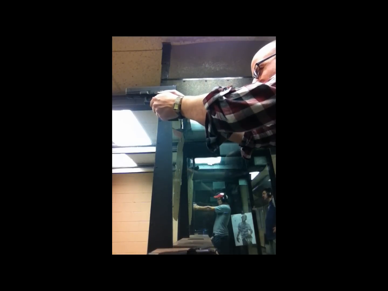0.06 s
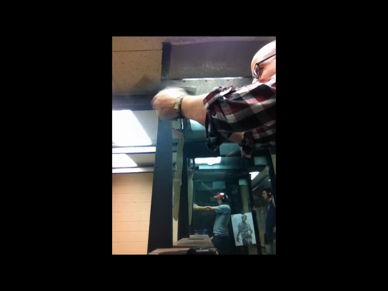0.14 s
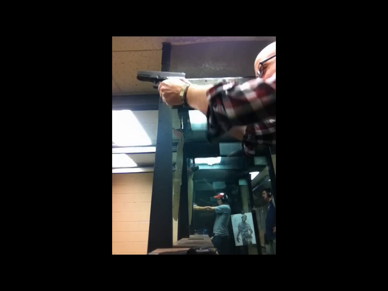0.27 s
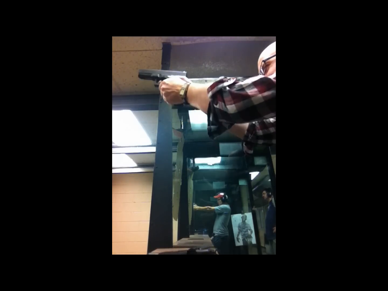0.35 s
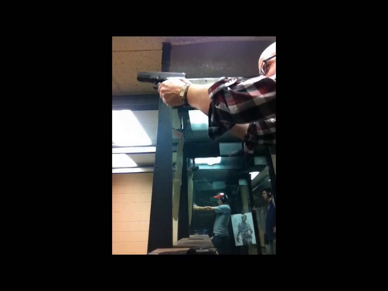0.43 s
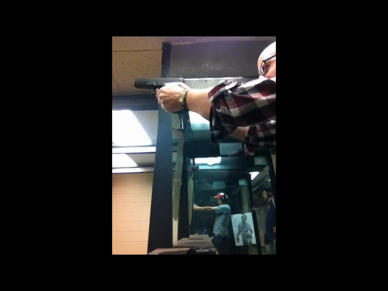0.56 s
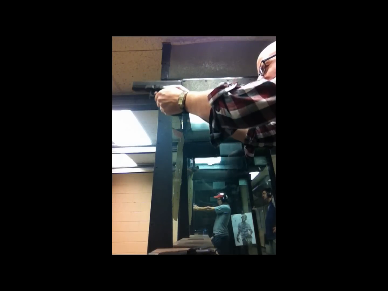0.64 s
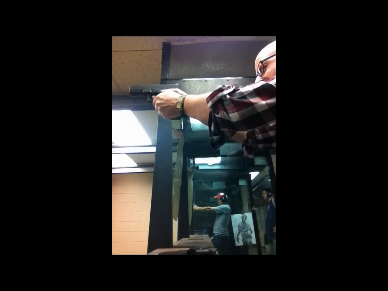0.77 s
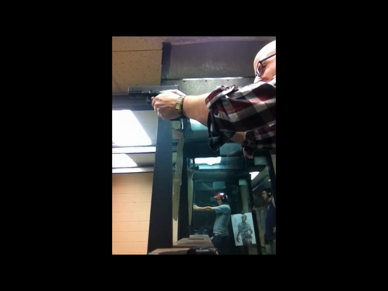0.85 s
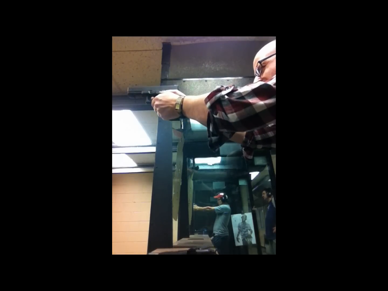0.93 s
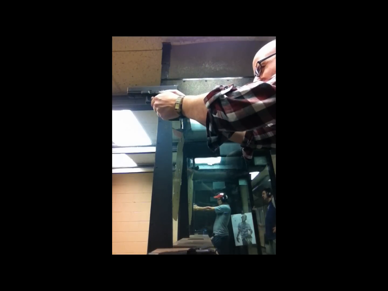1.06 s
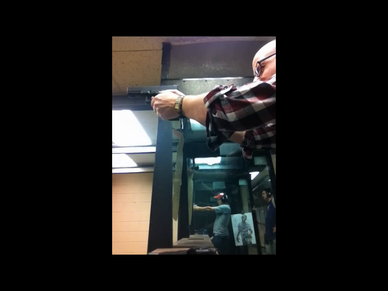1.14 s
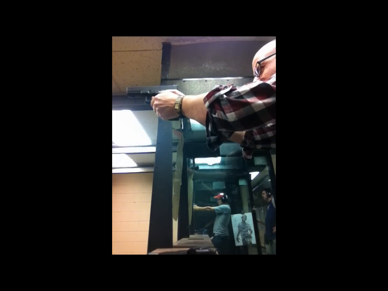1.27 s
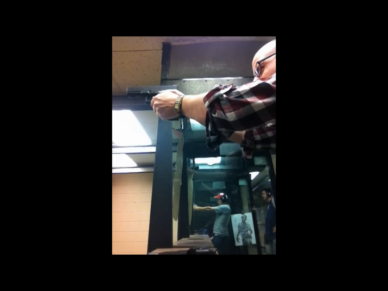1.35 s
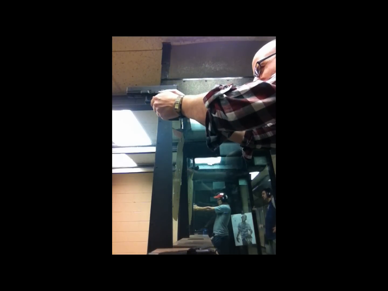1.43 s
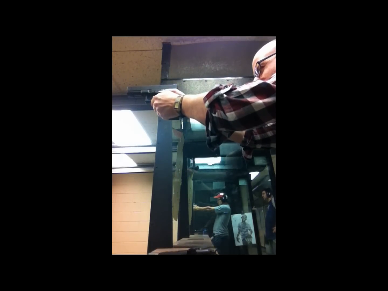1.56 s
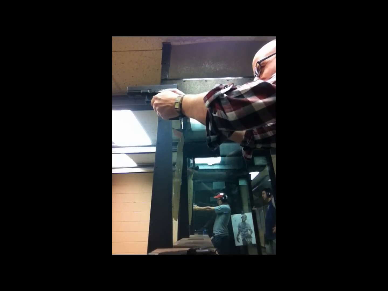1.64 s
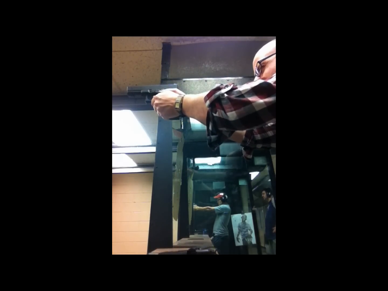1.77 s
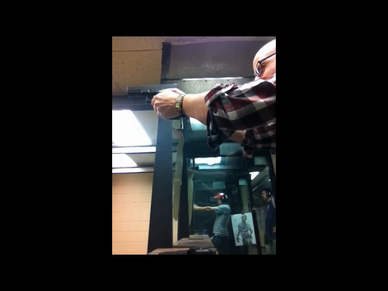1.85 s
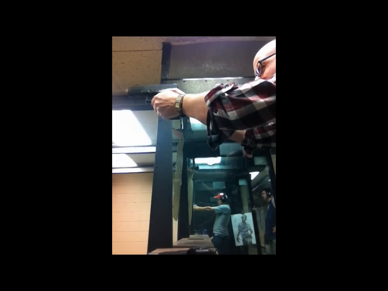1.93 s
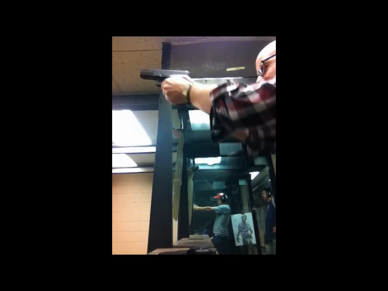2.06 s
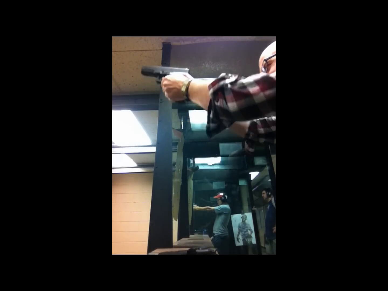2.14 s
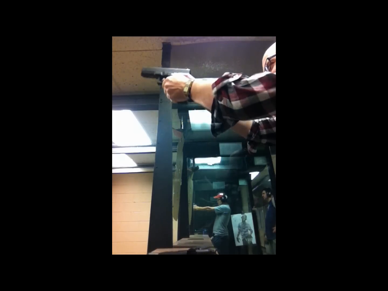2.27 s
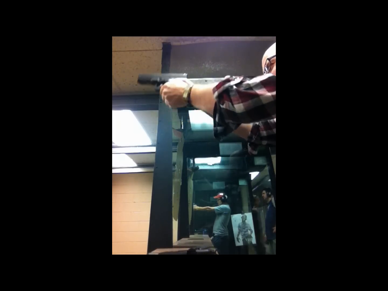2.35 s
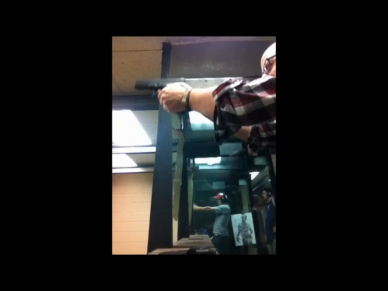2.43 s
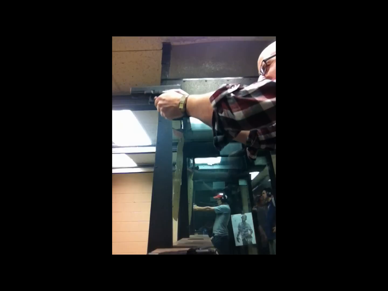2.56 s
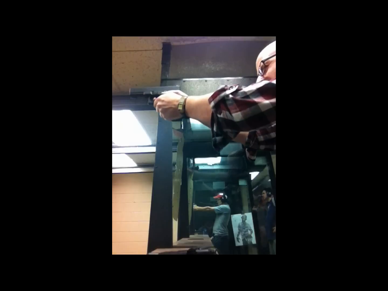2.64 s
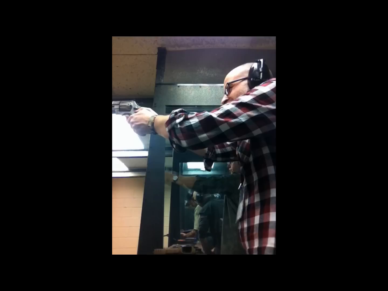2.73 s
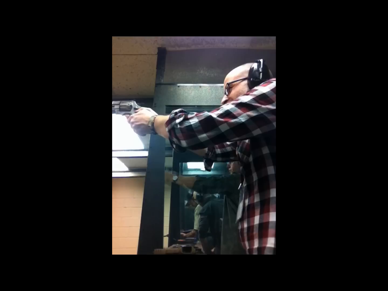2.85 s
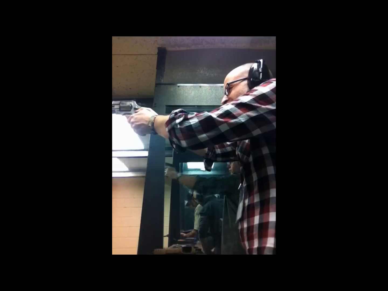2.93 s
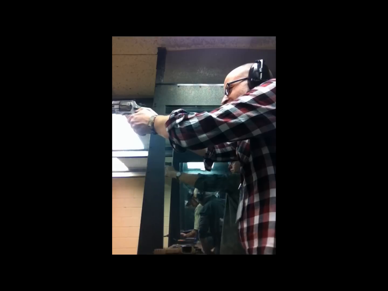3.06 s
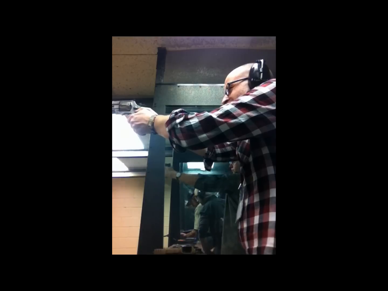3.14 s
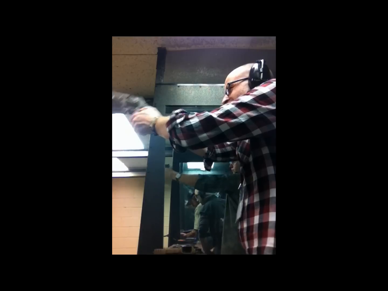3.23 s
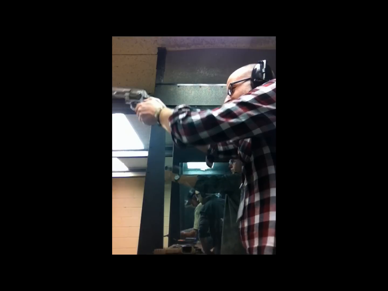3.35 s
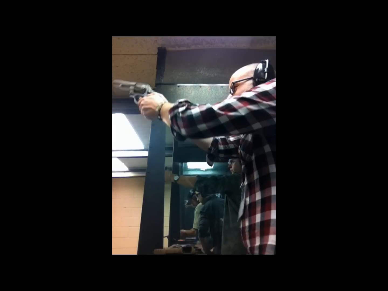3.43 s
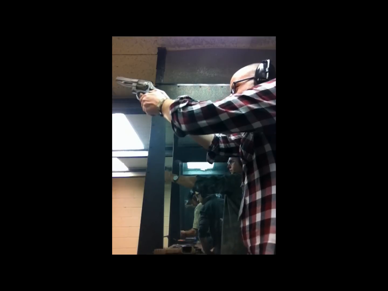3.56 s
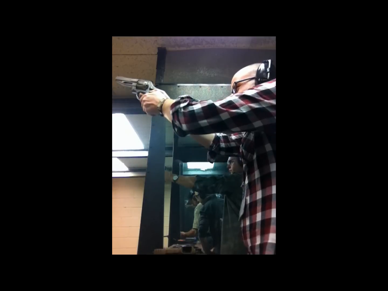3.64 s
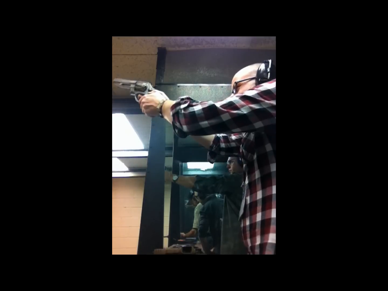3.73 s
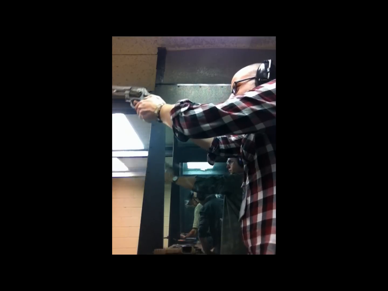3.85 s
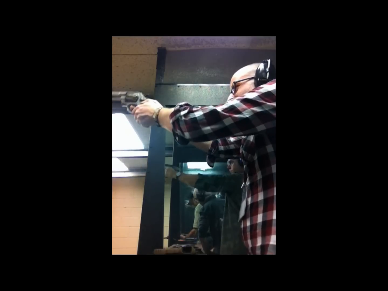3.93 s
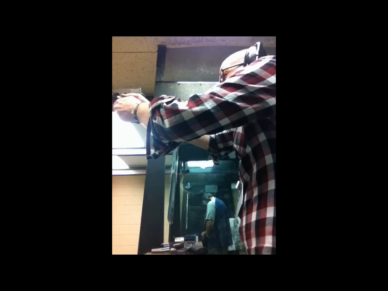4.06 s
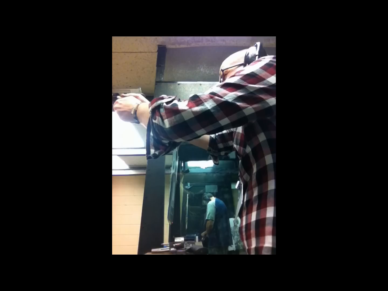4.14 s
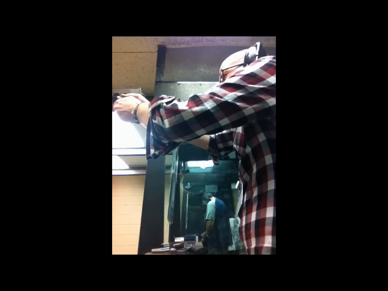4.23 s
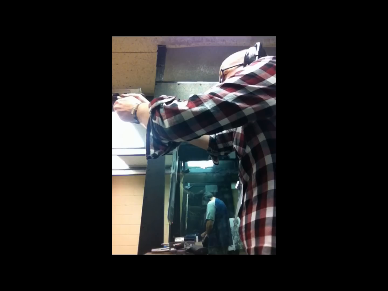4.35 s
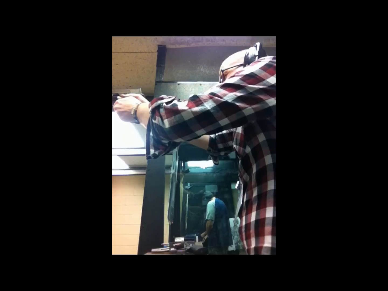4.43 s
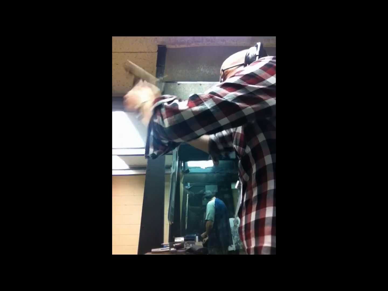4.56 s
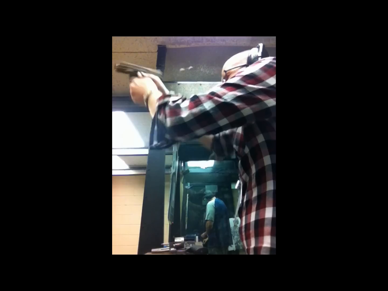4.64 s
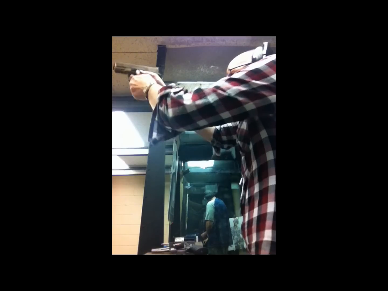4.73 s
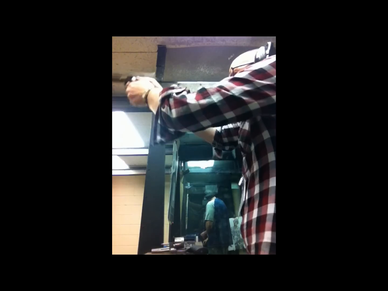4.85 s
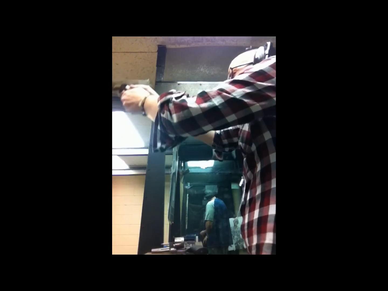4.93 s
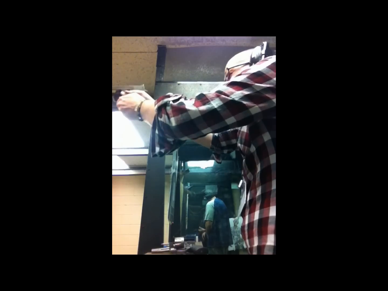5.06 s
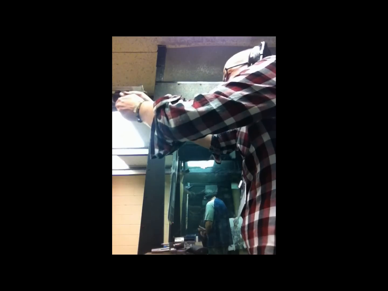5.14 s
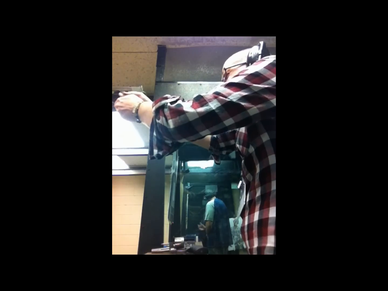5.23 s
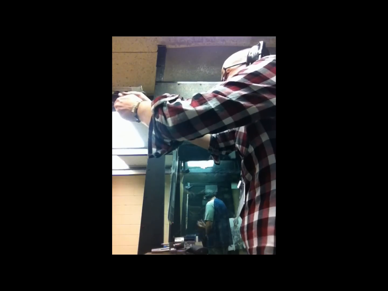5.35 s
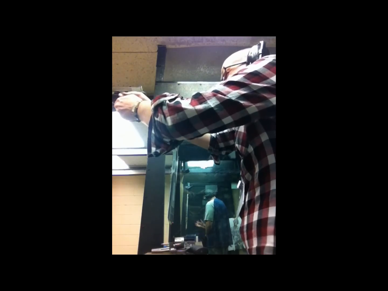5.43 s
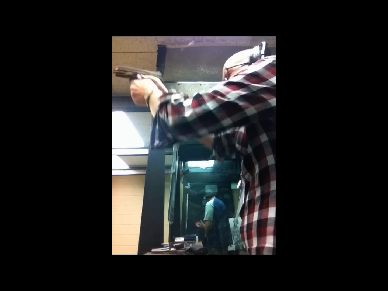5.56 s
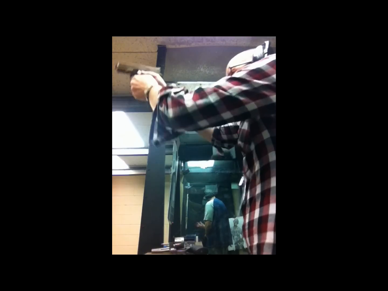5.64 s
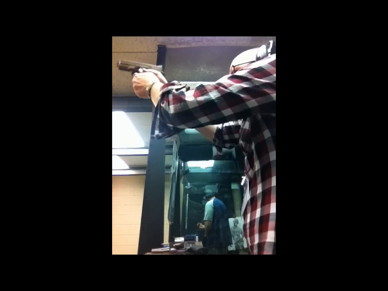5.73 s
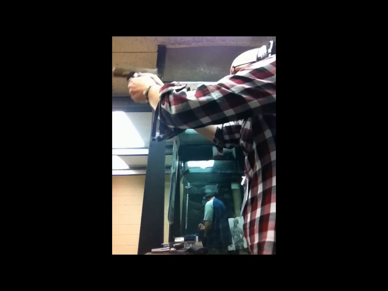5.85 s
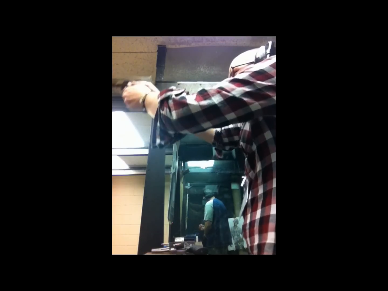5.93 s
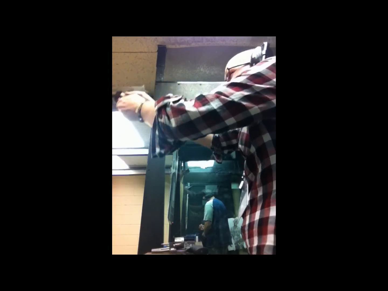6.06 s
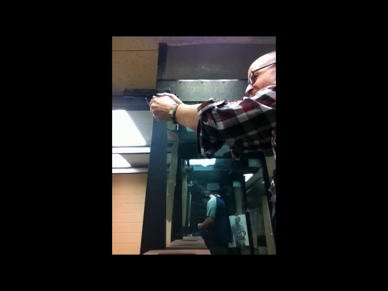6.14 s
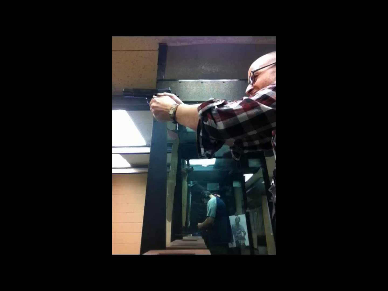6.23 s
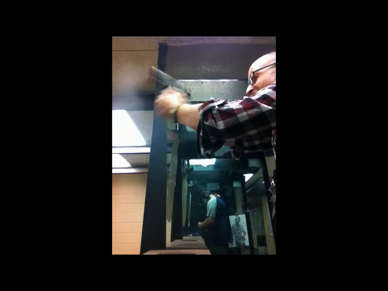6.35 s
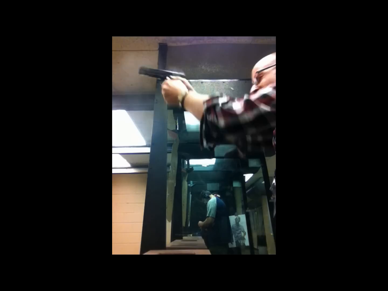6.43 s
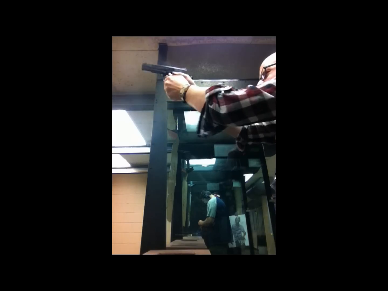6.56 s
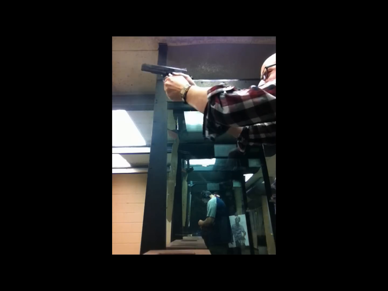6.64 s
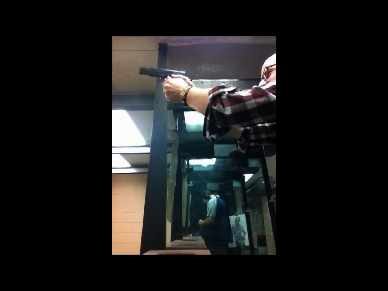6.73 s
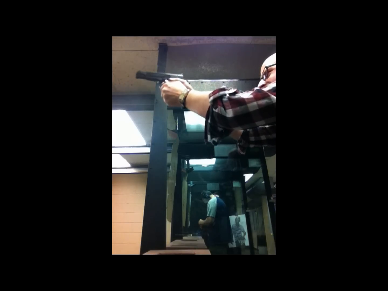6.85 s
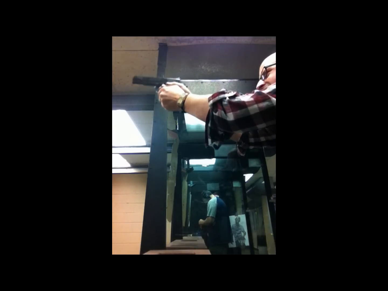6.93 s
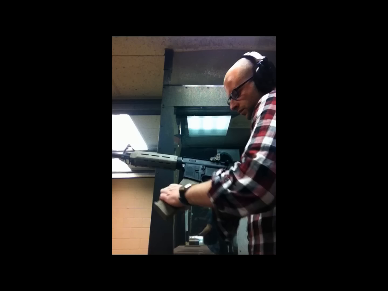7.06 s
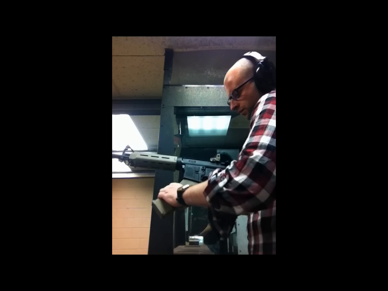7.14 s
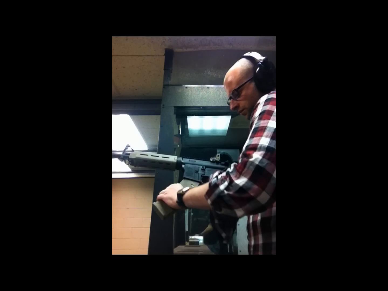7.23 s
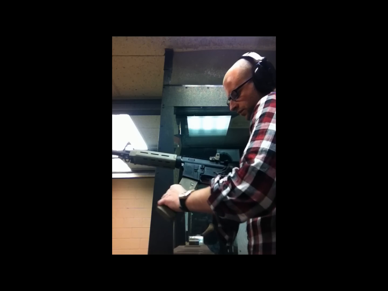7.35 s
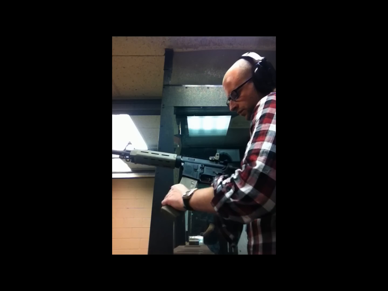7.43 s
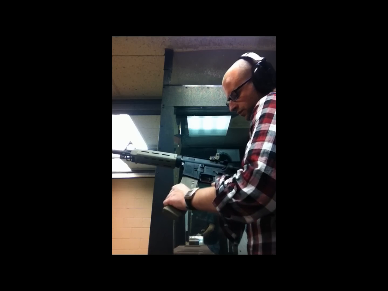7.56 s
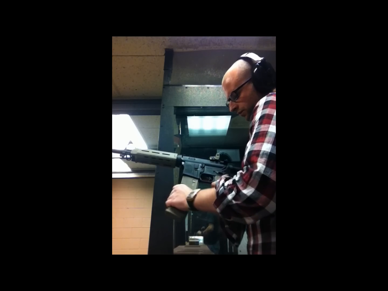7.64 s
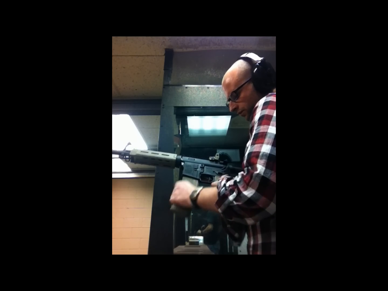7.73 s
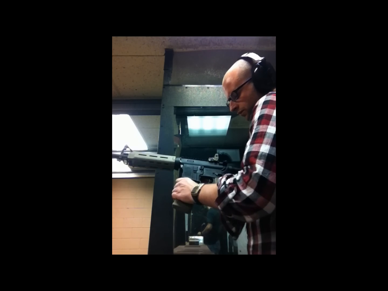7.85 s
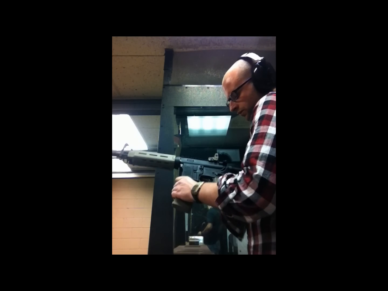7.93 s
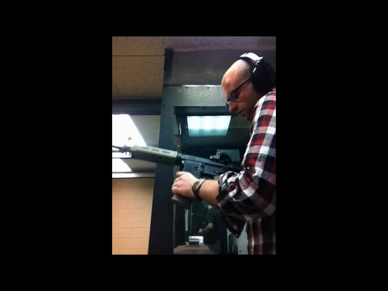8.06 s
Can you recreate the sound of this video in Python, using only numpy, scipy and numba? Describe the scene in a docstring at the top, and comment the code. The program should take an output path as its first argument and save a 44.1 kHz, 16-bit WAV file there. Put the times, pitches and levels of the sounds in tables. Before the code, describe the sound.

Ten loud pistol shots, first widely spaced, then closer together, boom through a reverberant shooting hall. The distorted phone microphone clips and briefly goes nearly silent after each crack before the roar swells and fades under gain control. Small cases tinkle high and thin. The last tail stops abruptly, leaving low fan drone, two bright steel clacks and the onset of a muffled shot from another lane.

```python
"""Indoor shooting range: handgun shots close to a phone's microphone, one distant shot from another lane,
and a hall tail already dying away when it comes in. Each blast is coloured noise that decays into the hall's
roar, while a slow pressure swing pins the capsule: only crackle gets through, then the roar bursts in and
dies away under gain control. Decaying sines make brass cases ring, snaps of resonant noise are a rifle's
action, steady noise is the ventilation. At three moments whatever still rings stops short."""
import sys
import numpy as np
from scipy import signal
from scipy.fft import rfft, irfft, next_fast_len
from scipy.io import wavfile
from scipy.ndimage import uniform_filter1d
from numba import njit

SR = 44100
rng = np.random.default_rng(int(sys.argv[2]) if len(sys.argv) > 2 else 0)


def generate_wav(signal):
    """Clip the signal to [-1, 1] and save it as 16-bit WAV at the path in sys.argv[1]."""
    frames = np.transpose(np.atleast_2d(signal))
    scaled = np.clip(frames, -1, 1) * 32767
    pcm = np.round(scaled).astype(np.int16)
    wavfile.write(sys.argv[1], SR, pcm)


N = 356769

# All levels are relative and apply ahead of the microphone and its gain control.
# close shots: (time [s], blast level [dB], hall treble tilt [dB per octave], age at first choke [s],
# length of first choke [s], age at which the capsule comes free [s])
SHOTS = [(0.1935, 30.5, 0, .035, .026, .1238), (2.0225, 30.5, -0.5, 0.038, 0.035, 0.13),
         (2.968, 32.5, 1, 0.029, 0.00074, 0.13), (3.278, 29, 1.5, 0.013, 0.035, 0.12),
         (3.915, 30, 2, 0.0078, 0.016, 0.13), (4.6135, 30, -1.5, 0.014, .031, 0.12),
         (4.772, 31, 0.56, 0.0075, 0.045, .113), (5.208, 30.5, 1, 0.0094, 0.016, 0.13),
         (5.5505, 32, 0.14, 0.013, 0.039, 0.13), (6.3905, 30, 1, 0.015, 0, 0.12)]
# a hall tail already dying away when it comes in, then a distant shot from another lane:
# (time [s], blast level [dB], hall level [dB], treble tilt [dB per octave])
FAR_SOUNDS = [(2.80, -50, -17, -3.5), (8.004, -9, -15.5, -0.1)]
# the hall's roar at ROAR_AGE_S after a shot, before bass lift and resonances: (frequency [Hz], density [dB per Hz])
ROAR = [(29, -69), (50, -50), (87, -10), (120, -9.5), (172, -4), (238, -5.5), (313, -2.5), (394, -5),
        (484, -1), (1010, -2.5), (1110, -3.5), (2640, -16), (6760, -40.5), (11200, -71), (12000, -78),
        (15600, -87), (22000, -120)]
# decay of the hall, before brighter shots stretch it: (frequency [Hz], time to fall 60 dB [s])
HALL_T60 = [(60, 1.4), (150, 1.67), (400, 1.34), (900, 1.623), (2000, 1.58), (4000, 0.87), (7000, 0.67),
            (11000, 0.49)]
# resonances of hall and booth: (frequency [Hz], width [Hz], level [dB])
BOOTH_MODES = [(74.5, 90, -13), (364, 18, 3), (400, 40, -2), (478, 23, 1), (687, 150, 3), (864, 37, 2.5),
               (1021, 40, 4), (2250, 900, 1.5), (4100, 20, 2)]
# slow pressure behind every shot, outside the chokes: (age [s], pressure [rms of the roar])
PRESSURE = [(0, .3), (.012, 1.3), (.03, 1.5), (.06, 1.25), (.095, 1.9)]
# the hall's lowest standing wave: (frequency [Hz], level [dB], time to fall 60 dB [s])
STANDING_WAVES = [(97.5, -13, 2.9)]
# the rifle's action: (time [s], level [dB], time to fall 60 dB [s])
CLACKS = [(7.8048, -16.5, .07), (7.8661, -12.5, 0.044)]
# smooth spectrum of the clacks: (frequency [Hz], density [dB per Hz])
CLACK_COLOUR = [(410, -47), (700, -19), (1070, -3.5), (2090, -8.5), (2530, -0.5), (2780, -1), (3090, -4),
                (3440, -5), (6240, -7.5), (7460, -11), (12000, -14), (15600, -45), (22000, -120)]
# resonances of the action's steel: (frequency [Hz], width [Hz], level [dB])
ACTION_MODES = [(1110, 150, 5), (1800, 150, 12), (2200, 150, -1), (3100, 150, 6), (4600, 150, 2),
                (5860, 150, 4), (6250, 260, 12), (11400, 250, 8)]
# bouncing cases: (time [s], size, tick level [dB], ring level [dB])
CASES = [(0.089, "small", -35.5, -40), (0.53, "small", -50, -46), (1.426, "small", -33.5, -45),
         (1.699, "small", -36.5, -46), (1.879, "small", -42.5, -36.5), (2.801, "large", -58, -35),
         (6.076, "medium", -56, -37), (6.186, "large", -48, -36), (6.281, "large", -48, -50)]
# modes of each size of case, relative to its ring level: (frequency [Hz], level [dB])
CASE_MODES = {"small": [(10990, 1), (5300, -12)], "medium": [(8446, 1), (11230, -5)],
              "large": [(7340, -0.5), (11880, -6.5)]}
# a struck steel part: (time [s], level [dB])
STEEL = [(1.70, -46), (6.18, -42)]
# ventilation spectrum, before its added bass: (frequency [Hz], density [dB per Hz])
AIR = [(18, -50), (30, -30), (108, -15.5), (207, 0.5), (341, -3), (523, -9), (578, -8), (742, -12),
       (1460, -16.5), (2130, -21), (2600, -28), (4630, -32), (7090, -36.5), (10900, -44.5), (12000, -47),
       (15600, -68), (22000, -120)]
# level of the steady background noise, before its added bass; it sits lower after the clacks:
# (time [s], level [dB])
BACKGROUND_LEVEL = [(0, -35.5), (7.75, -35), (7.95, -38.5)]
# pitches at which the ventilation drones: (frequency [Hz], width [Hz], level [dB])
FAN_MODES = [(248, 6.7, 1), (338, 29, 7.5), (1060, 91, 3)]
# moments at which ringing stops short: (time [s])
CUTS = [2.80, 6.178, 7.137]

T = np.arange(N) / SR
FREQ = np.maximum(np.fft.rfftfreq(next_fast_len(N), 1 / SR), 1)  # Hz
ROAR_AGE_S = 0.4
HALL_DB = -20  # hall against blast
STRETCH_PER_TREBLE = 0.035  # share of the hall's decay time per dB of treble tilt
TILT_FROM_HZ = 750
FRONT_DB, FRONT_T60 = 11, 0.0025  # shock front: level against blast, decay [s]
LAST_CHOKE_S = 0.037  # choke just before the capsule comes free
CASE_T60 = 0.27  # s
STEEL_HZ, STEEL_T60 = 2125, 1.3  # Hz, s
DROOP_HZ = 312  # the microphone loses bass below this
CEILING = 0.76  # amplitude at which output peaks are rounded
TOP_HZ = 11900  # upper limit of the microphone chain


def undb(db):
    """Decibels to gain."""
    return 10 ** (np.asarray(db) / 20)


def along(points, hz):
    """Read (frequency [Hz], value) points on a log-frequency axis."""
    f, value = np.transpose(points)
    return np.interp(np.log(hz), np.log(f), value)


def colour(points, peaks, hz):
    """Gain of a smooth spectrum with resonances on top."""
    resonances = sum(db / (1 + (2 * (hz - f) / width) ** 2) for f, width, db in peaks)
    return undb(along(points, hz) + resonances)


def noise(gain):
    """Noise of rms 1 with the given gain per frequency."""
    spectrum = rfft(rng.standard_normal(next_fast_len(N)))
    x = irfft(spectrum * gain)[:N]
    return x / x.std()


def fade(age, t60):
    """Exponential fall of 60 dB in t60 seconds."""
    return np.exp(-np.log(1000) * age / t60)


def span(s, length):
    """Samples and ages [s] of a sound from s on, ending no later than the next cut."""
    end = min([s + length, N / SR] + [cut for cut in CUTS if cut > s])
    i = np.arange(int(s * SR), min(int(end * SR), N))
    return i, (i - i[0]) / SR


def bass_lift():
    """The air holds more bass than the microphone lets through."""
    return np.hypot(1, DROOP_HZ / np.maximum(FREQ, 60))


def gunfire(blast_t60=0.42, blast_tilt_db=1.0, far_rise_s=0.011, far_t60=0.46, build_cycles=1.9):
    """Dense early reflections around the booth, then the hall's long roar, whose treble dies first."""
    centres = 47 * 2. ** np.arange(9)  # octave bands, Hz
    # run the roar's decay backwards to find its spectrum at the shot
    at_onset = bass_lift() * colour(ROAR, BOOTH_MODES, FREQ) / fade(ROAR_AGE_S, along(HALL_T60, FREQ))
    spectrum = rfft(noise(at_onset), next_fast_len(N))
    out = np.zeros(N)
    for hz, weights in zip(centres, np.eye(len(centres))):
        # neighbouring bands cross over linearly in log frequency
        band = irfft(spectrum * np.interp(np.log(FREQ), np.log(centres), weights))[:N]
        octaves = np.log2(hz / TILT_FROM_HZ)
        t60 = along(HALL_T60, hz)
        power = np.zeros(N)
        for s, blast_db, treble_db, *_ in SHOTS:
            i, age = span(s, 2.3)
            blast = undb(blast_db + blast_tilt_db * octaves) * fade(age, blast_t60)
            hall_db = blast_db + HALL_DB + treble_db * np.clip(octaves, 0, 2)
            # brighter shots ring longer
            hall = undb(hall_db) * fade(age, t60 * (1 + STRETCH_PER_TREBLE * treble_db))
            # low notes take longer to build up, so the first instant is all crack
            build = 1 - np.exp(-age * hz / build_cycles)
            power[i] += (blast ** 2 + hall ** 2) * build ** 2
        for s, blast_db, hall_db, tilt_db in FAR_SOUNDS:
            # the partitions block the far shot's direct sound, so it swells in; the tail gets the same short rise
            i, age = span(s, 2)
            swell = undb(tilt_db * max(octaves, 0)) * np.minimum(age / far_rise_s, 1)
            blast = undb(blast_db) * fade(age, far_t60)
            hall = undb(hall_db) * fade(age, t60)
            power[i] += swell ** 2 * (blast ** 2 + hall ** 2)
        out += band * np.sqrt(power)
    return out


def shock_fronts():
    """The sharp pressure front from the muzzle, ahead of all reflections."""
    out = np.zeros(N)
    for s, blast_db, *_ in SHOTS:
        i, age = span(s, 0.02)
        out[i] -= undb(blast_db + FRONT_DB) * fade(age, FRONT_T60)
    return out


def pressure_swing(pinned=5.24, rebound=2.88, settle_s=0.036, ease_s=0.003):
    """Slow pressure [rms of the roar]: one-way push with choking crests, then a flip that settles."""
    swing = np.zeros(N)
    for s, _, _, choke, choke_s, free in SHOTS:
        i, age = span(s, 1)
        first_crest = (age > choke) & (age < choke + choke_s)
        last_crest = age > free - LAST_CHOKE_S
        # between the crests the push is low enough for the roar's peaks to crackle through
        push = np.where(first_crest | last_crest, pinned, np.interp(age, *np.transpose(PRESSURE)))
        swing[i] = np.where(age < free, -push, rebound * np.exp(-(age - free) / settle_s))
    return uniform_filter1d(swing, int(ease_s * SR))


def standing_wave():
    """A low room mode hums on, started afresh by every close shot."""
    out = np.zeros(N)
    for s, *_ in SHOTS:
        i, age = span(s, 2)
        for hz, db, t60 in STANDING_WAVES:
            out[i] = undb(db) * np.sin(2 * np.pi * hz * age) * fade(age, t60)
    return out


def rifle(room_db=-26, room_t60=0.3):
    """Steel parts snap together as resonant noise, with a faint answer from the booth."""
    out = np.zeros(N)
    metal = noise(colour(CLACK_COLOUR, ACTION_MODES, FREQ))
    for s, db, t60 in CLACKS:
        i, age = span(s, 0.5)
        decay = fade(age, t60) + undb(room_db) * fade(age, room_t60)
        out[i] += undb(db) * metal[i] * decay
    return out


def brass(tick_hz=5500, tick_width_hz=1600, tick_t60=0.11):
    """Spent cases tick on the concrete and ring in their modes; a steel part sings lower."""
    out = np.zeros(N)
    detuning = (FREQ / tick_hz - tick_hz / FREQ) * tick_hz / tick_width_hz
    tick = noise(1 / np.hypot(1, detuning))
    for s, size, tick_db, ring_db in CASES:
        i, age = span(s, 0.76)
        ring = sum(undb(ring_db + db) * np.sin(2 * np.pi * hz * age) for hz, db in CASE_MODES[size])
        out[i] += undb(tick_db) * tick[i] * fade(age, tick_t60) + ring * fade(age, CASE_T60)
    for s, db in STEEL:
        i, age = span(s, 1)
        out[i] += undb(db) * np.sin(2 * np.pi * STEEL_HZ * age) * fade(age, STEEL_T60)
    return out


def ventilation(rumble_db=6, rumble_hz=70):
    """Air rushing through ducts that drone at a few pitches."""
    heard = colour(AIR, FAN_MODES, FREQ)
    air = heard * bass_lift() * undb(rumble_db / (1 + (FREQ / rumble_hz) ** 4))
    # the added bass comes on top of the set level
    added = np.sqrt(np.mean(air ** 2) / np.mean(heard ** 2))
    return noise(air) * added * undb(np.interp(T, *np.transpose(BACKGROUND_LEVEL)))


def scene():
    """Sound pressure at the phone, all sources together."""
    # the roar dips to nothing at each cut, within a few milliseconds
    to_cut_s = np.min(np.abs(T[:, None] - CUTS), axis=1)
    roar = gunfire() * np.clip(to_cut_s / 0.0025, 0, 1)
    # running rms of the roar scales the slow pressure
    strength = np.sqrt(np.abs(signal.lfilter(*signal.butter(1, 45, fs=SR), roar ** 2)))
    shots = shock_fronts() + roar + strength * pressure_swing() + standing_wave()
    return (shots + rifle() + brass() + ventilation())[None]


def microphone(x, rail_db=10, knee=2.53, leak_db=-56, coupling_hz=85, coupling_width=1.58):
    """The capsule saturates; its coupling blocks steady pressure, so a pinned capsule is nearly silent."""
    held = x / (1 + np.abs(x / undb(rail_db)) ** knee) ** (1 / knee)
    w = 2 * np.pi * coupling_hz
    coupling = signal.bilinear([1, 0, 0], [1, coupling_width * w, w * w], SR)
    droop = signal.butter(1, DROOP_HZ, "high", fs=SR)
    coupled = signal.lfilter(*coupling, held + undb(leak_db) * x)
    return signal.lfilter(*droop, coupled)


def fizz(x, fizz_db=-9, fizz_t60=0.017):
    """A short fizz of decaying noise follows every spike."""
    age = np.arange(SR // 40) / SR
    hiss = signal.lfilter(*signal.butter(2, 900, "high", fs=SR), rng.standard_normal(len(age)))
    tail = hiss * fade(age, fizz_t60)
    return x + signal.fftconvolve(x, undb(fizz_db) * tail / np.linalg.norm(tail))[:N]


@njit
def envelope(x, rise, keep):
    """Charges on peaks and leaks away between them."""
    out, e = np.empty(len(x)), 1e-9
    for i in range(len(x)):
        e = e + (x[i] - e) * rise if x[i] > e else e * keep
        out[i] = e
    return out


def follow(x, attack_s, release_s):
    """Peak envelope of a signal."""
    return envelope(np.abs(x), 1 - np.exp(-1 / (attack_s * SR)), np.exp(-1 / (release_s * SR)))


def gain_control(x, slow_top_db=-3.5, slow_attack_s=0.01, slow_release_s=0.95,
                 top_db=-2.0, attack_s=0.00004, release_s=0.02):
    """A slow stage ducks after loud sound and creeps back; a fast limiter holds the peaks."""
    x = x / np.maximum(follow(x, slow_attack_s, slow_release_s) / undb(slow_top_db), 1)
    return x / np.maximum(follow(x, attack_s, release_s) / undb(top_db), 1)


def record(dry, makeup_db=3.0, overload_db=24, overload_slope=0.42, overload_release_s=0.031):
    """Overloaded microphone, gain control, rounded peaks and a cut top."""
    # the gain starts from rest again at the last two cuts
    parts = np.split(fizz(microphone(dry[0])), [int(s * SR) for s in CUTS[1:]])
    x = undb(makeup_db) * np.concatenate([gain_control(part) for part in parts])
    # the heaviest overload pulls the gain down further, so the roar blooms as it lets go
    overload = follow(dry[0], 0.000049, overload_release_s) / undb(overload_db)
    x = x / np.maximum(overload, 1) ** overload_slope
    rounded = x / np.sqrt(np.hypot(1, np.square(x / CEILING)))
    low_pass = signal.ellip(8, 0.2, 70, TOP_HZ, fs=SR, output="sos")
    return signal.sosfilt(low_pass, rounded)[None]


dry = scene()
out = record(dry)
generate_wav(out)
```